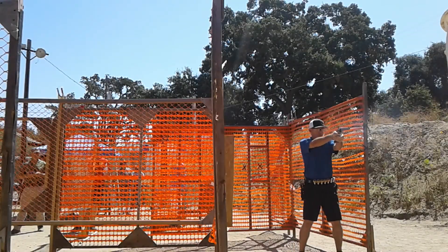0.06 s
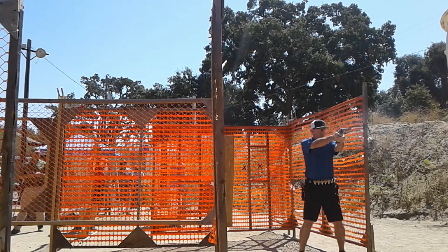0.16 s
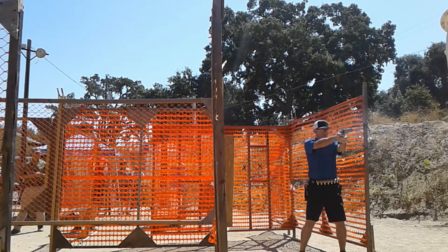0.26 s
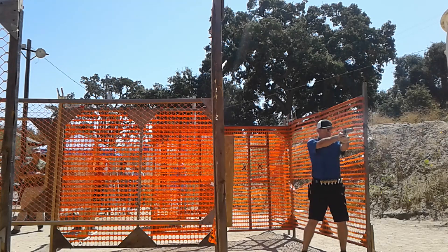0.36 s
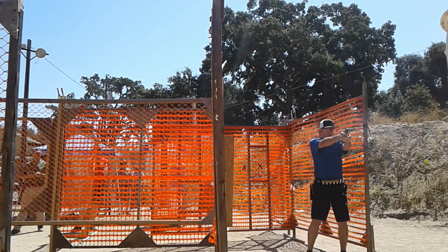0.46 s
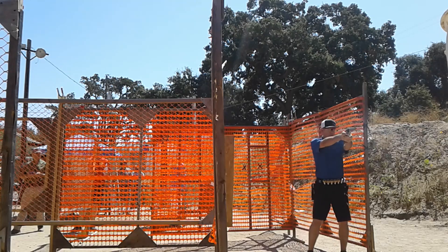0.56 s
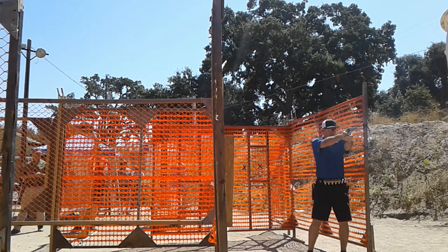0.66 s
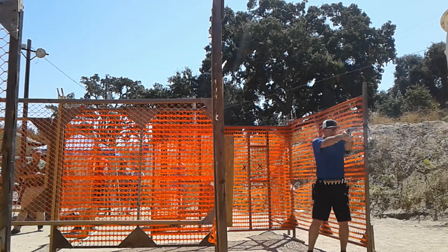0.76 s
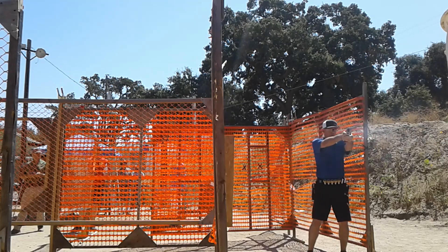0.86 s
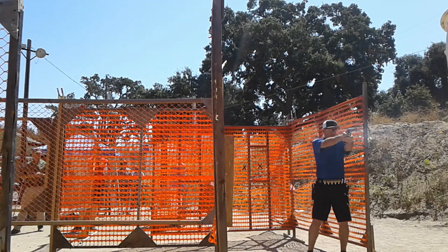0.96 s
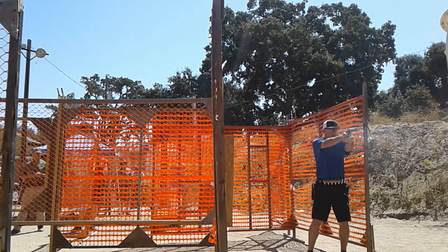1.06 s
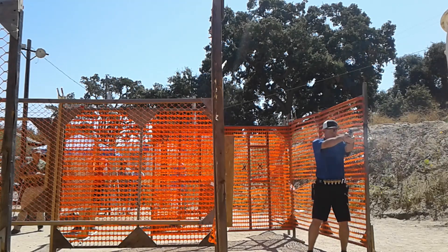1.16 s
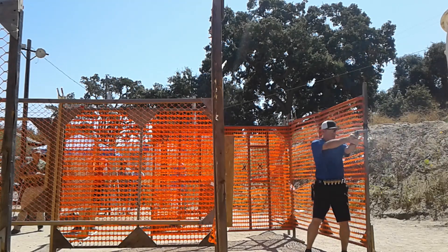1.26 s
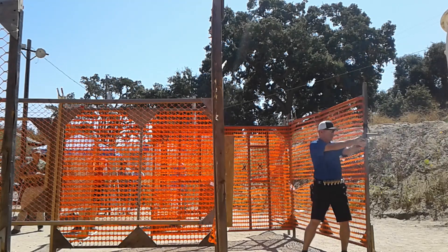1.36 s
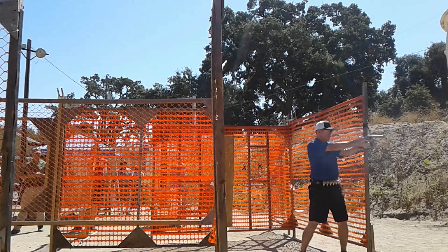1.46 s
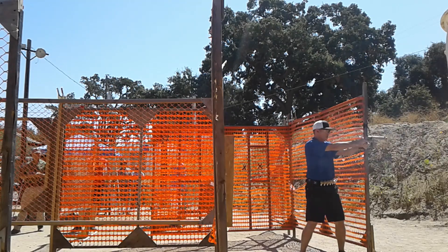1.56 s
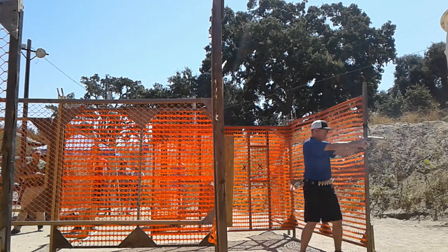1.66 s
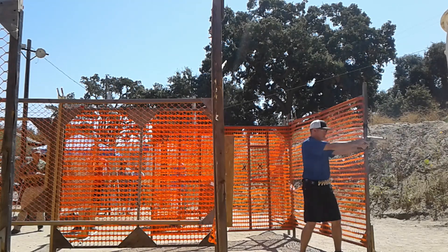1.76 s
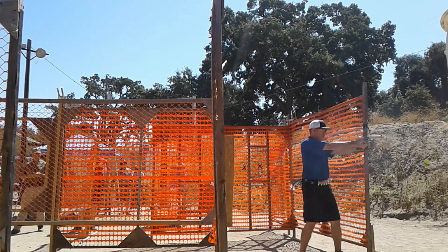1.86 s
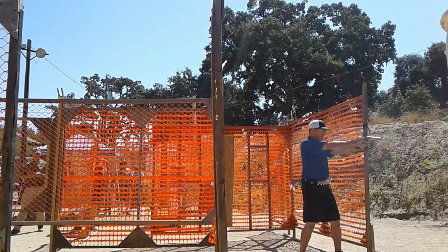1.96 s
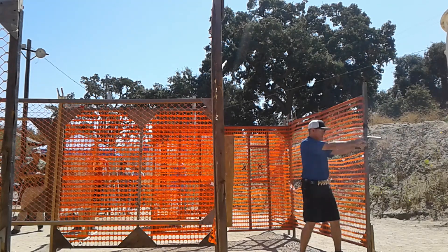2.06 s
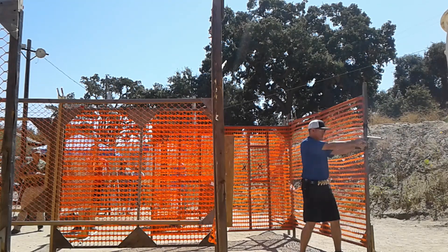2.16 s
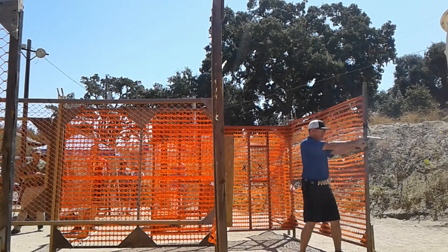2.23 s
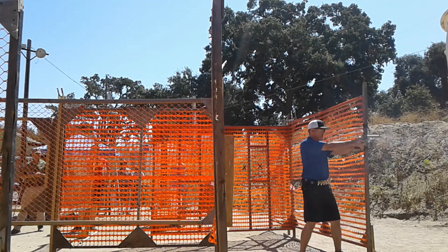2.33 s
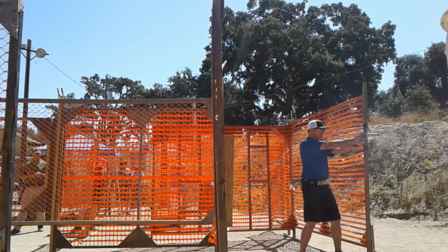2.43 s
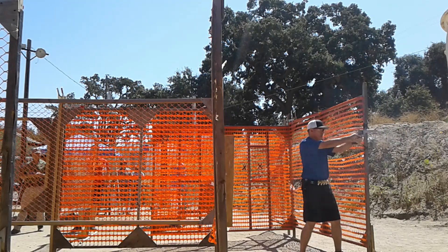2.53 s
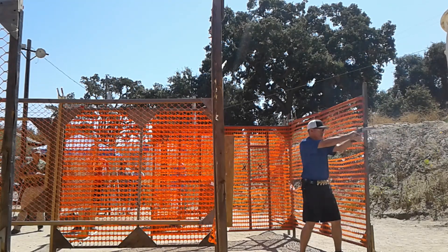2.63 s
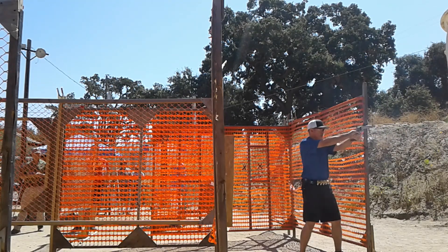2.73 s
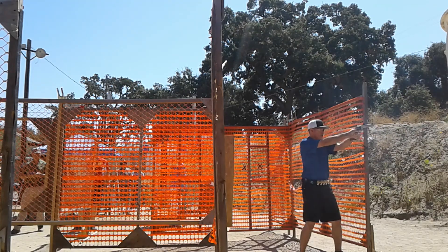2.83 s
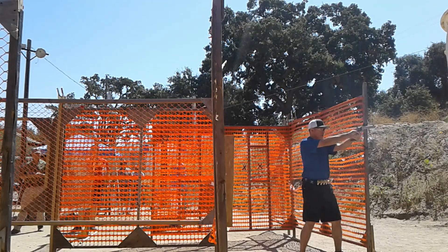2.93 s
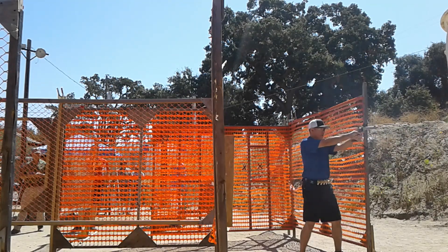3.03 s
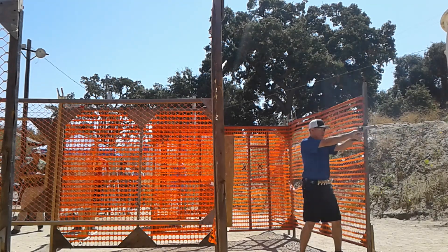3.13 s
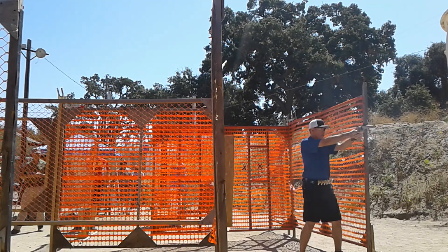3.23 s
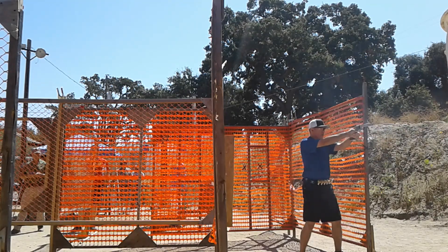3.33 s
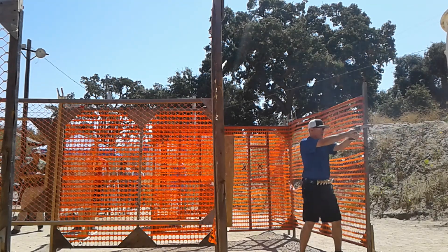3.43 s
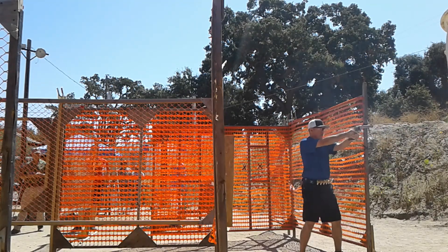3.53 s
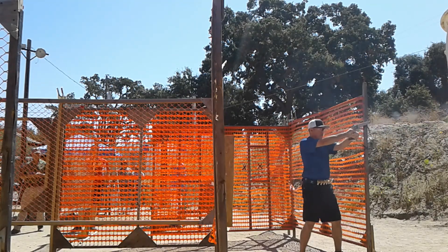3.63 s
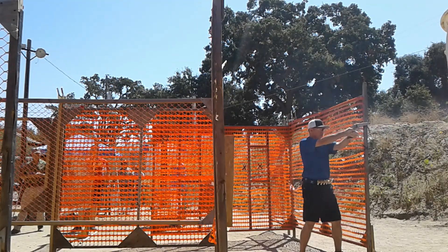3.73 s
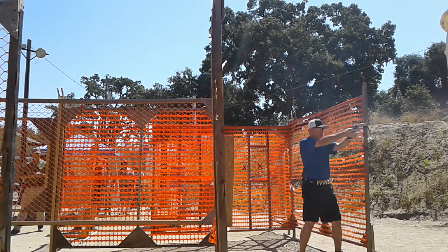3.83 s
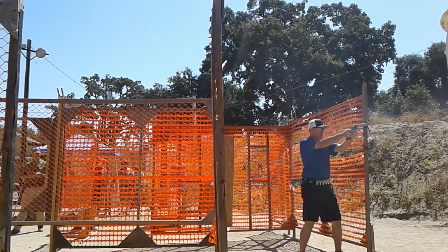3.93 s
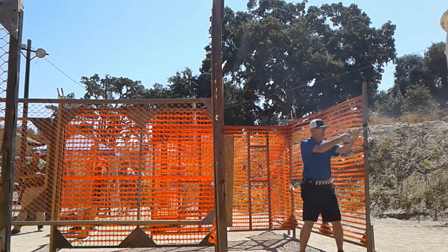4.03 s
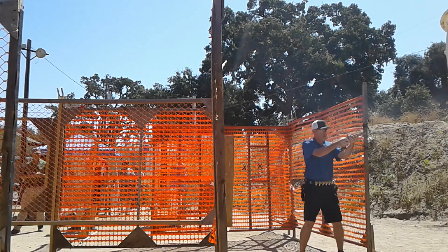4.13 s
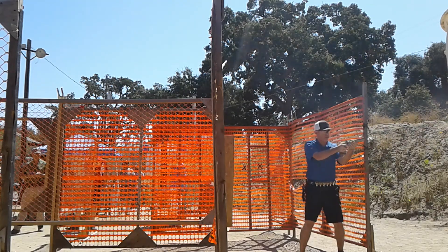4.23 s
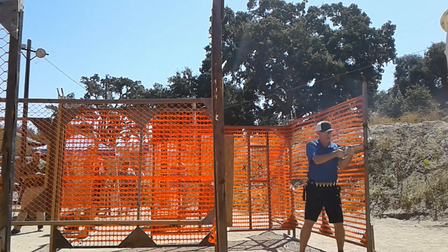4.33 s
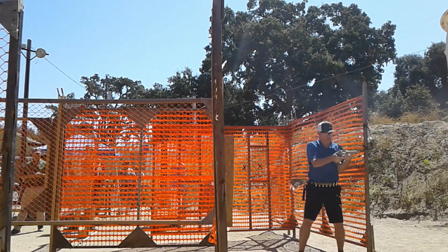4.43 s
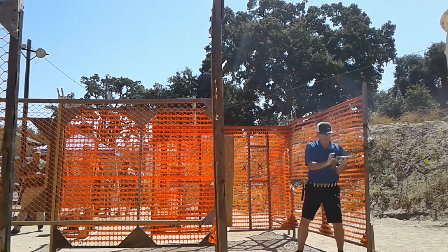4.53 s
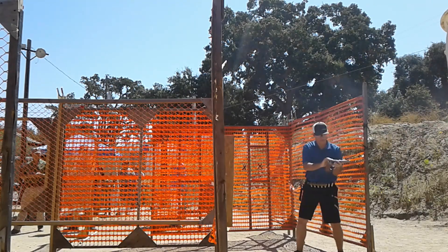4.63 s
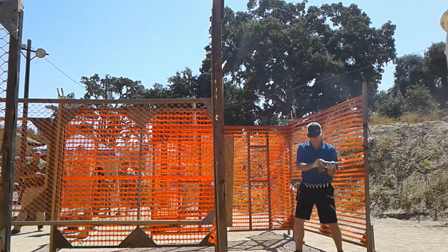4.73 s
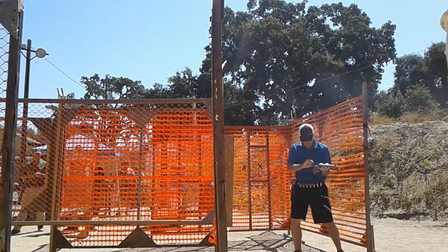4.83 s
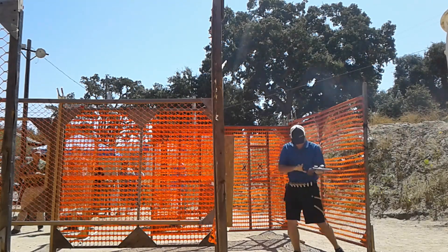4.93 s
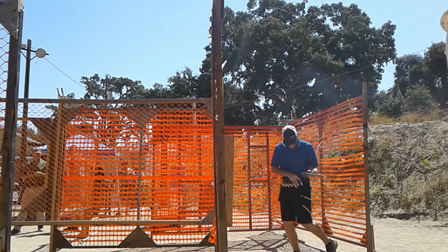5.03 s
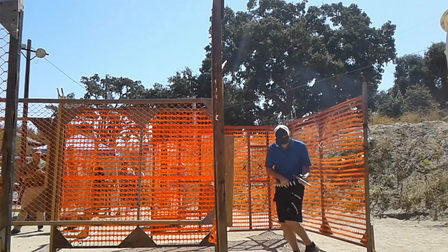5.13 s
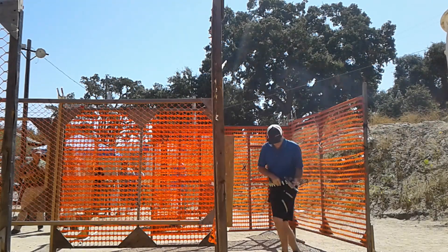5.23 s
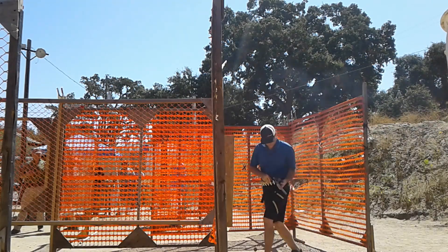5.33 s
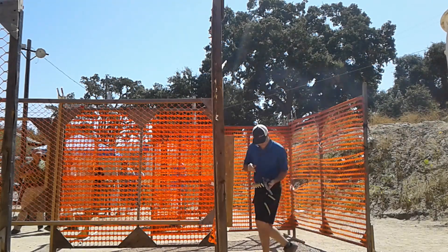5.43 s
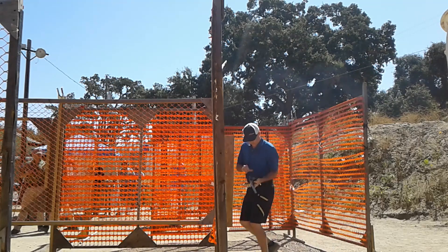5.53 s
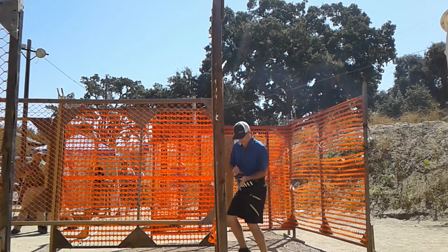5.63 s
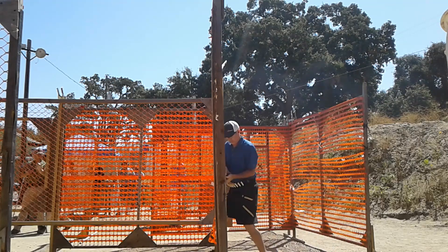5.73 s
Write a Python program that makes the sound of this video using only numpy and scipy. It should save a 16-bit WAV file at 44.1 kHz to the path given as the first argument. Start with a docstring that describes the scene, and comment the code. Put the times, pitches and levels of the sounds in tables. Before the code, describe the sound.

A revolver is fired outdoors, captured from a few metres behind the shooter, nearly centred with slight width on the blasts. Shots come at about 0.1, 0.95, 2.0, 2.4, 3.4 and 3.8 seconds, each a bright, peak-squashed crack with a short boom, a dense bay roar, thumping reflections and a longer hill tail. A wall clap about a quarter second later is strongest on the last shot. The first bullet rings a steel plate with a wavering tone; it clanks down near 0.8. The second gives a higher, thinner ring and a faint landing at 1.7, amid tiny squeaks. Gravel scuffs sound near 0.8, 1.7 and 2.8, with a step at 3.0 and a bright steel tick around 2.1. After the last echo fades, a faint hollow knock and step come at 4.5, then quiet metal ticks, crunching steps and delicate cartridge clinks from 5.2 to the end over soft air.

```python
"""Six revolver shots in an outdoor shooting bay, from a few metres behind the shooter, over quiet outdoor air.
Each is a bright noise crack and short boom, then bay roar, thumps and a clap off banks and wall, then a hill tail.
The first two bullets ring steel plates (wavering sines), which topple and clank as they hit the ground.
Between shots the shoes grind gravel (clumped noise) and small steel parts tick and squeak (narrow noise).
Last, the shooter walks off and starts to reload: knocks of the gun, then clinking cartridges."""
import sys
import numpy as np
from scipy import signal
from scipy.fft import rfft, irfft
from scipy.io import wavfile
from scipy.ndimage import uniform_filter1d

SR = 44100
rng = np.random.default_rng(int(sys.argv[2]) if len(sys.argv) > 2 else 0)


def unload_wav(signal):
    """Save mono or channel-first audio to the path in sys.argv[1] as 16-bit WAV at rate SR, clipped to [-1, 1]."""
    wavfile.write(
        sys.argv[1],
        SR,
        np.round(np.clip(np.atleast_2d(signal).T, -1, 1) * 32767).astype(np.int16),
    )


N = 254898
TAIL = 65536  # samples in one event
AGE = np.arange(TAIL) / SR  # s since the event began

# Shots; the last two columns depend on the aim:
# (time [s], blast level [dB], crack trim [dB], echo trim [dB], wall clap trim [dB])
SHOTS = [(0.104, -2.6, -0.5, -3.5, -18), (0.946, -2.5, -0.5, -4, -11), (1.9986, -3.34, -1.5, 0, -12.5),
         (2.412, -3.5, -2, -0.5, -24), (3.4196, -3, -1.8, 0, -7.5), (3.788, -1.9, -1.6, -1.5, -3)]
# Spectrum of stones and dirt: (frequency [Hz], level [dB])
GRAVEL_COLOUR = [(30, -44), (150, -10), (400, -7.5), (780, 6), (1400, -1.5), (3000, -0.5), (4200, -6),
                 (9500, -5.5), (11500, -30), (14500, -21)]


def amp(db):
    """Decibels to gain."""
    return 10 ** (np.asarray(db) / 20)


def unit(x):
    """Scales to rms 1."""
    return x / np.sqrt(np.mean(x ** 2) + 1e-20)


def level(points, t):
    """Gain at times t along a curve of (time [s], level [dB])."""
    return amp(np.interp(t, *np.transpose(points)))


def colour(x, points, tilt_db=0):
    """Filters by a spectrum of (frequency [Hz], level [dB]), tilted in dB per octave."""
    octave = np.log2(np.fft.rfftfreq(len(x), 1 / SR) + 1)
    hz, db = np.transpose(points)
    gain = amp(np.interp(octave, np.log2(hz), db) + tilt_db * octave)
    return irfft(rfft(x) * gain, len(x))


def band(x, low_hz, high_hz, order=2):
    """Causal band-pass."""
    edges_hz = [low_hz, min(high_hz, SR / 2 - 1)]
    return signal.sosfilt(signal.butter(order, edges_hz, "band", fs=SR, output="sos"), x)


def noise(size=TAIL):
    """White noise."""
    return rng.standard_normal(size)


def strike(rise_s, t60_s, hold_s=0):
    """Envelope: linear climb, hold, exponential decay."""
    decay_age = np.maximum(AGE - rise_s - hold_s, 0)
    return np.minimum(AGE / rise_s, 1) * np.exp(-np.log(1000) * decay_age / t60_s)


def add(mix, s, sound):
    """Mixes a sound in at time s, cut at the end of the mix."""
    part = mix[max(round(s * SR), 0):][:len(sound)]
    part += sound[:len(part)]


def gunfire(crack_db=-10.0, crack_t60_s=0.28, boom_db=-25, near_clump_db=1.56, far_clump_db=1.5,
            slap_db=-5, slap_hz=1500, wall_delay_s=0.2472):
    """Each shot: bright crack, short boom, roar of the bay, separate echoes, wall clap and far tail."""
    # spectra: (frequency [Hz], level [dB])
    crack_colour = [(30, -20.5), (80, -2), (200, -6.5), (1000, 1), (3500, 5), (6500, -3), (9500, 3.5),
                    (11500, -20), (14500, -11)]
    banks_colour = [(18, -60.5), (30, -29.5), (102, -10.5), (304, -2), (485, -1.5), (837, -1), (953, -0.5),
                    (1440, -2), (1920, -0.5), (2920, -14), (9390, -21), (10400, -23), (11600, -56.5),
                    (12800, -38), (15000, -42)]
    hill_colour = [(18, -67.5), (30, -46.5), (102, -15.5), (129, -8), (320, 2), (404, -0.5), (716, -6),
                   (774, -6.5), (1030, -4.5), (1920, -5), (2770, -15), (9640, -24.5), (11600, -56),
                   (13900, -38.5), (15000, -29)]

    out, banks, hill = np.zeros(N), noise(), noise()  # one terrain for all shots
    echoes = reflectors()
    # the roar builds, stays level for about 70 ms as the recorder's limiter holds it, then dies away
    bay_gain = amp(-8) * strike(0.0047, 0.35, hold_s=0.071)
    # hill and trees answer from near edge to far edge; level follows powers of the delay
    hill_near_s, hill_far_s = 0.22, 0.28
    hill_swell = np.minimum(AGE / hill_near_s, 1) ** 2.3
    hill_fade = np.maximum(AGE / hill_far_s, 1) ** 3.84
    hill_gain = amp(-26) * hill_swell / hill_fade

    for s, blast_db, bright_db, echo_db, aim_db in SHOTS:
        crack = unit(colour(noise(), crack_colour)) * strike(0.006, crack_t60_s)
        crack *= amp(crack_db + bright_db)
        boom = unit(band(noise(), 70, 150, order=3)) * strike(0.016, 0.028, hold_s=0.055)
        boom *= amp(boom_db)

        # props, trunks and rocks return sound in clumps
        clumps = unit(uniform_filter1d(noise(), size=200))
        near = bay_gain * amp(near_clump_db * clumps) * scatter(banks, banks_colour, same_below_hz=1400)
        far = hill_gain * amp(far_clump_db * clumps) * scatter(hill, hill_colour, same_below_hz=6600)
        roar = band(near + far, 105, 20000)  # the longest waves pass round the obstacles

        add(out, s, crack + amp(blast_db) * (boom + roar + amp(echo_db) * echoes))
        # the facing wall returns a sharp clap after the round trip
        add(out, s + wall_delay_s, amp(slap_db + aim_db) * thump(slap_hz))
    return out


def scatter(terrain, spectrum, same_below_hz):
    """Long waves take the same paths at every shot; short ones change as the muzzle moves."""
    same = 1 / (1 + (np.fft.rfftfreq(TAIL, 1 / SR) / same_below_hz) ** 2)
    paths = same * rfft(terrain) + np.sqrt(1 - same ** 2) * rfft(noise())
    return unit(colour(irfft(paths), spectrum))


def reflectors(count=8, first_s=0.013, last_s=0.19, prop_db=-13, fall_db_per_s=50, prop_hz=400):
    """Thumps off main berms and walls, and off lesser props at random delays, weaker with distance."""
    # berms and walls: (delay [s], peak level [dB], pitch [Hz], length [cycles])
    berms = [(0.0395, -7, 310, 2.3), (0.0655, -9, 260, 2.3), (0.1072, -9, 370, 2.3),
             (0.2178, -19, 430, 2.3), (0.2418, -14.5, 310, 2.3), (0.2765, -17, 1700, 2.3),
             (0.294, -23, 330, 11)]
    out = np.zeros(TAIL)
    for delay_s, db, hz, cycles in berms:
        add(out, delay_s, amp(db) * thump(hz, cycles))
    for k, (place, size) in enumerate(rng.random((count, 2))):
        delay_s = first_s + (last_s - first_s) * (k + place) / count
        pitch_hz = prop_hz * 2 ** (2 * size - 1)  # within an octave either way
        add(out, delay_s, amp(prop_db - fall_db_per_s * delay_s) * thump(pitch_hz))
    return out


def thump(hz, cycles=2.33):
    """A blast wave rounded by its bounce: a few swings, soon gone."""
    phase = hz * AGE
    window = np.sin(np.pi * np.minimum(phase / cycles, 1)) ** 2
    return window * np.sin(2 * np.pi * phase)


def spread(db=-24, rise_s=0.012, t60_s=0.13):
    """For a moment after each blast the two channels rasp differently."""
    # left-right difference: (frequency [Hz], level [dB])
    side_colour = [(30, -10.5), (100, -0.5), (400, -1), (1500, 1), (4000, -1.5), (9500, -2), (11500, -17),
                   (14500, -15.5)]
    out = np.zeros(N)
    for s, *_ in SHOTS:
        add(out, s, amp(db) * unit(colour(noise(), side_colour)) * strike(rise_s, t60_s))
    return out


def targets(clank_db=-3, bounce_s=0.071, bounce_db=-4.5, landed_t60_s=0.6, thud_t60_s=0.24):
    """Each plate rings when hit, topples, lands with one bounce and is silenced by the dirt."""
    # plate modes: (frequency [Hz], level [dB], swell [s], t60 [s])
    big_plate = [(802, -27, 0.04, 1.8), (1043, -28.5, 0.02, 0.71), (1880, -33, 0.017, 0.37),
                 (3075, -28, 0.025, 0.75), (5054, -23.5, 0.018, 0.35)]
    small_plate = [(3234, -23, 0.097, 0.38), (3947, -23.5, 0.1, 0.6), (7290, -12.5, 0.021, 0.68),
                   (9200, -45, 0.02, 0.58), (13760, -34.5, 0.02, 0.28)]
    # one row per plate: (hit time [s], landing time [s], clank trim [dB], thud level [dB])
    falls = [(0.145, 0.821, -29, -52), (0.972, 1.698, -53.5, -45.5)]
    out = np.zeros(N)
    for modes, (hit_s, landing_s, steel_db, thud_db) in zip((big_plate, small_plate), falls):
        add(out, hit_s, plate(modes) * strike(1 / SR, landed_t60_s, landing_s - hit_s))
        thud = unit(band(noise(), 120, 320)) * strike(0.0074, thud_t60_s)
        add(out, landing_s, amp(thud_db) * thud)
        add(out, landing_s, amp(clank_db + steel_db) * clank())
        add(out, landing_s + bounce_s, amp(clank_db + steel_db + bounce_db) * clank())
    return out


def plate(modes):
    """A struck steel plate; it swings, so each mode swells and wavers."""
    out = np.zeros(TAIL)
    for hz, db, rise_s, t60_s in modes:
        swing = 1 + 0.2 * unit(band(noise(), 6, 22))
        tone = np.sin(2 * np.pi * (hz * AGE + rng.random()))
        out += amp(db) * strike(rise_s, t60_s) * swing * tone
    return out


def clank(t60_s=0.07, click_db=0, click_t60_s=0.021):
    """A toppled plate hits the ground: a click and a few choked resonances."""
    # resonances: (frequency [Hz], half width [Hz], relative level [dB])
    resonances = [(1100, 120, -3), (2126, 150, 0), (2850, 190, -8.5), (5020, 250, -1.5), (8890, 530, -3)]
    ring = unit(sum(amp(db) * unit(band(noise(), hz - width_hz, hz + width_hz))
                    for hz, width_hz, db in resonances))
    click = amp(click_db) * unit(colour(noise(), GRAVEL_COLOUR)) * strike(0.00091, click_t60_s)
    return ring * strike(0.0013, t60_s) + click


def gravel(slide_grain_db=3.0, step_grain_db=2.3, rise_share=0.21,
           count=5, pebble_db=2, pebble_t60_s=0.013, pebble_share=0.45):
    """A slide swells, fades and flicks a few pebbles; a shoe set down crunches at once."""
    # slides: (time [s], level [dB], length [s], treble tilt [dB per octave])
    scuffs = [(0.779, -40, 0.26, 4.5), (1.678, -53.5, 0.43, -2), (2.779, -41, 0.23, -1.5),
              (5.22, -62.5, 0.16, 5), (5.429, -44, 0.24, -2.5), (5.576, -60.5, 0.27, 2)]
    # shoes set down: (time [s], level [dB], t60 [s], treble tilt [dB per octave])
    steps = [(3.021, -38, 0.13, 3.5), (4.5, -50, 0.069, -1), (5.48, -37, 0.035, 1.5),
             (5.596, -44.5, 0.068, -1), (5.743, -45, 0.052, 1)]
    out = np.zeros(N)
    for s, db, length_s, tilt_db in scuffs:
        pebbles = np.zeros(TAIL)
        for k, place in enumerate(rng.random(count)):
            pebble_s = pebble_share * length_s * (k + place) / count
            add(pebbles, pebble_s, amp(pebble_db) * strike(0.0005, pebble_t60_s))
        slide = strike(rise_share * length_s, length_s)  # the length is the fade's t60
        add(out, s, amp(db) * crunch(tilt_db, slide_grain_db) * np.hypot(slide, pebbles))
    for s, db, t60_s, tilt_db in steps:
        add(out, s, amp(db) * crunch(tilt_db, step_grain_db) * strike(0.002, t60_s))
    return out


def crunch(tilt_db, grain_db):
    """Stones grinding in small clumps: noise with a fast random level."""
    grains = noise() * amp(grain_db * unit(uniform_filter1d(noise(), size=70)))
    return unit(colour(grains, GRAVEL_COLOUR, tilt_db))


def ticks(ring_hz=10350, ring_t60_s=0.16, bay_db=-23, bay_t60_s=1.0):
    """Small steel parts click, ring thinly and leave a faint tail in the bay."""
    # ticks: (time [s], level [dB], t60 [s], ring level relative to click [dB])
    clicks = [(2.137, -13.5, 0.059, -12), (2.624, -30.5, 0.15, -22), (2.989, -49.5, 0.07, -16),
              (4.932, -51, 0.067, -19), (5.112, -46, 0.022, -23), (5.264, -52, 0.036, -23),
              (5.56, -36.5, 0.055, -3), (5.757, -48, 0.05, -13.5)]
    # click spectrum: (frequency [Hz], level [dB])
    click_colour = [(100, -35), (1500, -19), (4000, 3), (7500, 0), (10000, 10), (12000, -12), (14000, 7.5)]
    out = np.zeros(N)
    for s, db, t60_s, ring_db in clicks:
        envelope = strike(0.001, t60_s) + amp(bay_db) * strike(0.01, bay_t60_s)
        click = unit(colour(noise(), click_colour)) * envelope
        ring = unit(band(noise(), ring_hz - 90, ring_hz + 90)) * strike(0.00061, ring_t60_s)
        add(out, s, amp(db) * (click + amp(ring_db) * ring))
    return out


def handling(count=14, from_s=5.2, to_s=5.76, clink_db=-56, spread_db=8,
             low_hz=2500, high_hz=8000, clink_t60_s=0.065, width_share=0.14):
    """The gun knocks hollowly as it is opened; cartridges clink at random as the reload begins."""
    # knocks: (time [s], level [dB], pitch [Hz])
    knocks = [(4.5, -51.5, 3250), (5.25, -55, 790)]
    out = np.zeros(N)
    for s, db, hz in knocks:
        body = unit(band(noise(), hz * (1 - width_share), hz * (1 + width_share)))
        add(out, s, amp(db) * body * strike(0.004, 0.077))
    for when, softness, *pitches in rng.random((count, 5)):
        pitches_hz = [low_hz * (high_hz / low_hz) ** p for p in pitches]
        ring = unit(sum(np.sin(2 * np.pi * hz * AGE) for hz in pitches_hz))
        s = from_s + (to_s - from_s) * np.sqrt(when)  # denser towards the end
        add(out, s, amp(clink_db - spread_db * softness) * ring * strike(1 / SR, clink_t60_s))
    return out


def squeaks(width_share=0.03, rise_s=0.01537, t60_s=0.38):
    """Thin squeaks of moving steel: narrow noise, heard as unsteady tones."""
    # squeaks: (time [s], pitch [Hz], level [dB])
    tones = [(1.665, 1856, -54), (1.768, 1782, -52.5), (1.838, 5040, -47), (1.838, 10180, -63.5),
             (5.664, 5500, -63)]
    out = np.zeros(N)
    for s, hz, db in tones:
        tone = unit(band(noise(), hz * (1 - width_share), hz * (1 + width_share)))
        add(out, s, amp(db) * tone * strike(rise_s, t60_s))
    return out


def air():
    """Quiet outdoor background: coloured noise at a slowly moving level."""
    # level curve: (time [s], level [dB])
    air_level = [(0, -57.5), (3.3, -61), (5.1, -65), (5.78, -54.5)]
    # spectrum: (frequency [Hz], level [dB])
    air_colour = [(25, -5.5), (55, -5.5), (120, 4.5), (350, 3.5), (700, -7), (1800, -8), (3300, -15),
                  (7000, -23), (9800, -14), (11500, -37.5), (14500, -24.5)]
    return level(air_level, np.arange(N) / SR) * unit(colour(noise(N), air_colour))


def scene():
    """All sources lie straight ahead; only the blasts have a little width."""
    mid = gunfire() + targets() + gravel() + ticks() + handling() + squeaks() + air()
    side = spread()
    return np.array([mid + side, mid - side])


def record(dry, low_cut_hz=50, ceiling=0.9, edge_hz=14900):
    """The recorder cuts deep bass, rounds off overloaded blast peaks, then limits the band."""
    x = signal.sosfilt(signal.butter(3, low_cut_hz, "high", fs=SR, output="sos"), dry)
    squashed = x / (1 + (x / ceiling) ** 6) ** (1 / 6)
    lowpass = signal.firwin(401, edge_hz, window=("kaiser", 8), fs=SR)
    return signal.oaconvolve(squashed, lowpass[None], "same")


dry = scene()
out = record(dry)
unload_wav(out)
```